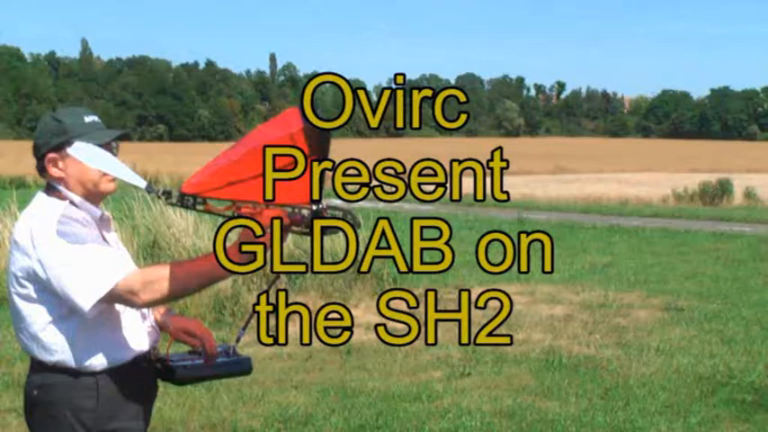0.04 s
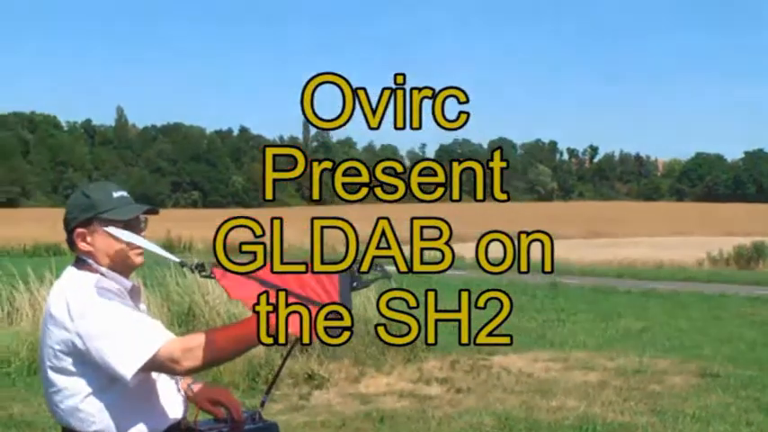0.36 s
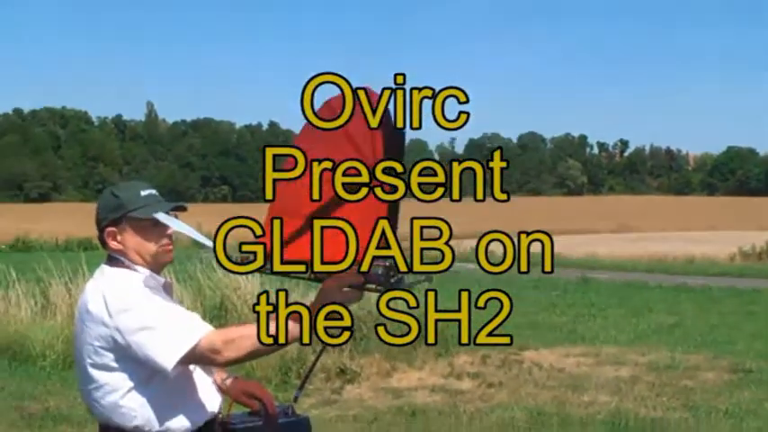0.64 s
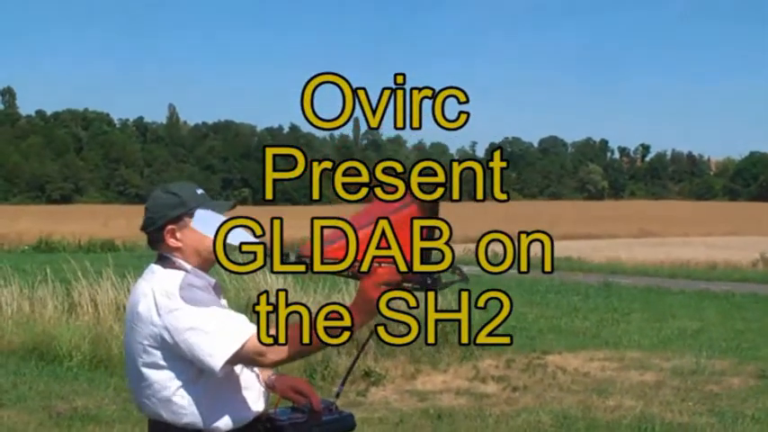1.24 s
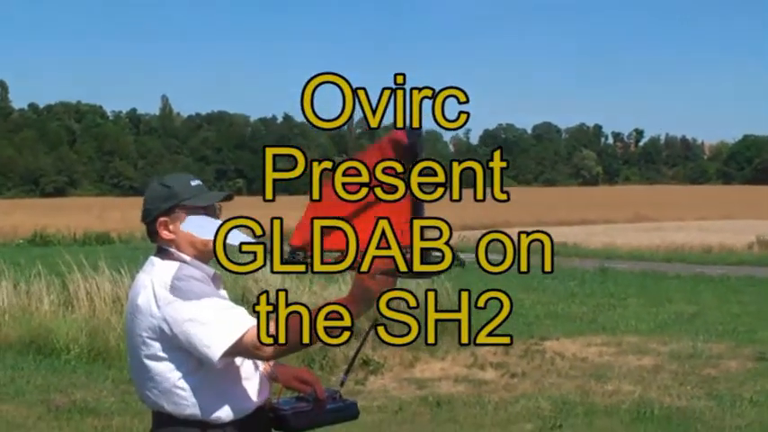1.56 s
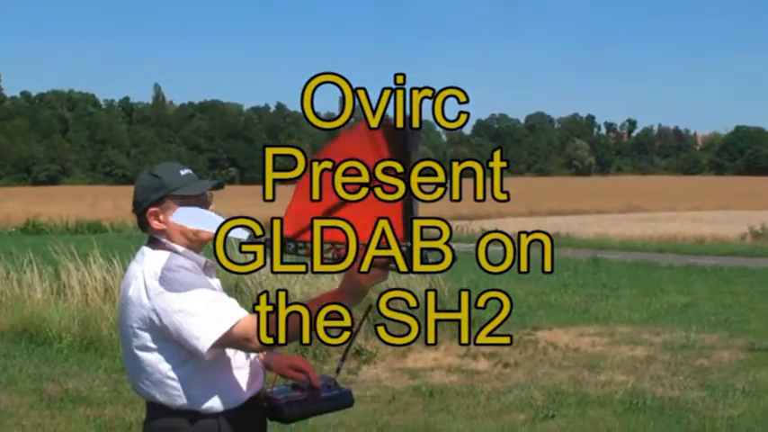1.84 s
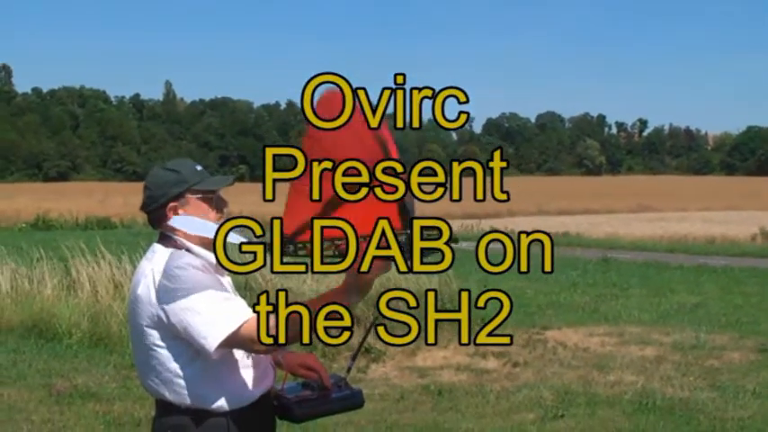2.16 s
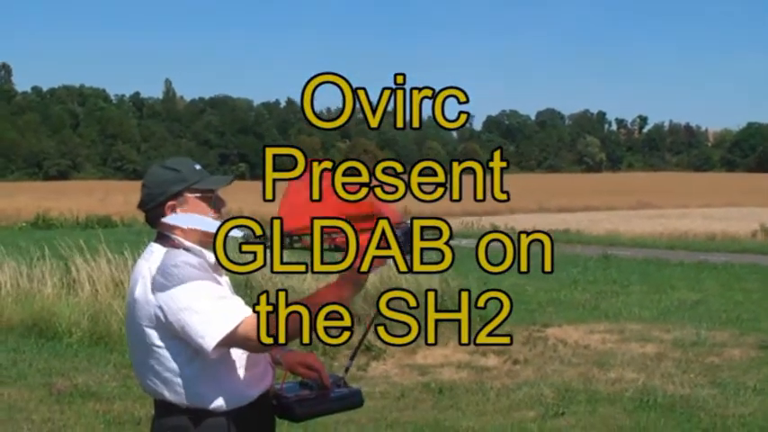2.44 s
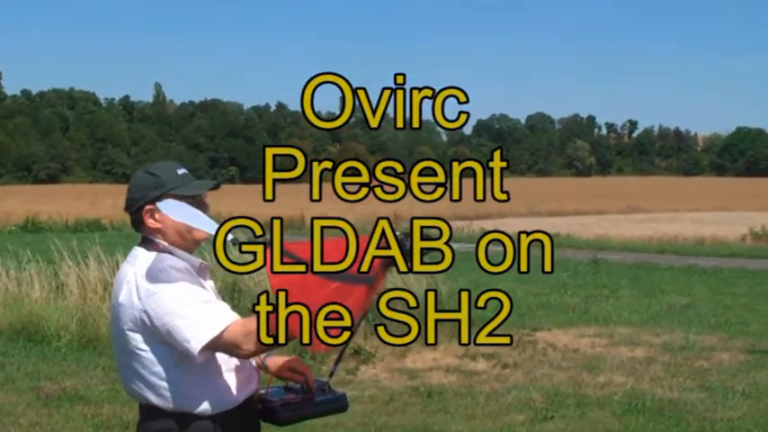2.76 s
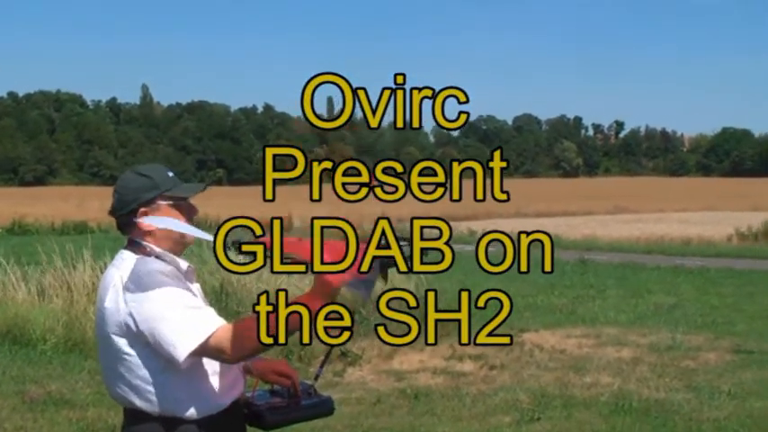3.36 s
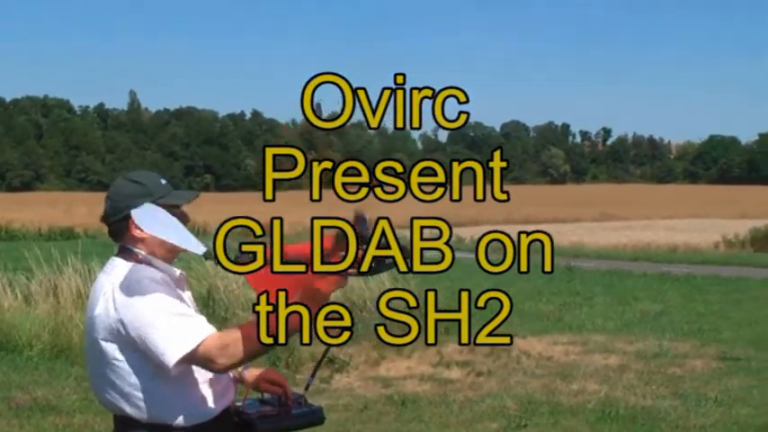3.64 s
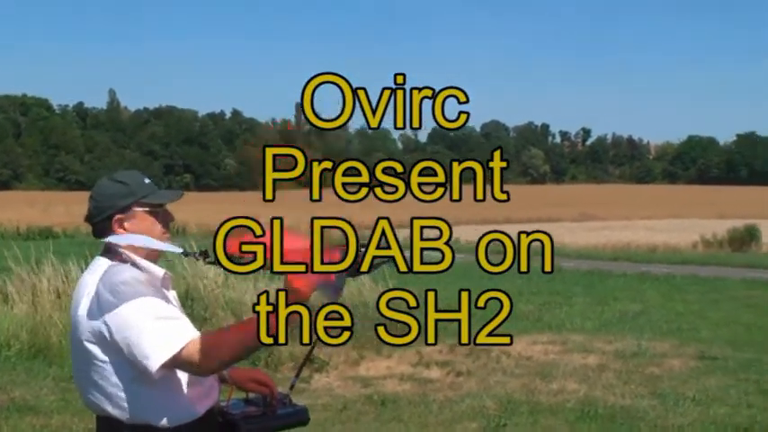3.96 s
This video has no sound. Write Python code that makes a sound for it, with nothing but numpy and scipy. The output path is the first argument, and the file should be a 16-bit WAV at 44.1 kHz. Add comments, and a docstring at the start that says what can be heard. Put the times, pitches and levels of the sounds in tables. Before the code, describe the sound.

Whirring gears and quickening wing flaps of a motorized toy bird, over low wind rumble.

```python
"""Flapping model bird in the wind

A hand-held model bird runs up its electric drive in an open field, to the listener's right.
The pinion whirs at its tooth rate, amplitude-modulated by a once-a-turn throb. Each wing
stroke loads the motor, so that the pitch sags while linkage and wing film rattle.
Moving air rumbles on the microphone."""
import sys
import numpy as np
from scipy.fft import rfft, irfft, next_fast_len
from scipy.io import wavfile
from scipy.ndimage import map_coordinates

SR = 44100
rng = np.random.default_rng(int(sys.argv[2]) if len(sys.argv) > 2 else 0)


def pcm_store(signal):
    """Save signal as 16-bit PCM."""
    levels = np.round(np.clip(np.atleast_2d(signal), -1, 1) * 32767)
    wavfile.write(sys.argv[1], SR, levels.astype(np.int16).T)


N = 176400
T = np.arange(N) / SR
START_S = .163

# motor speed without load (time [s], speed [turns/s])
FREE_SPEED = [(.17, 90), (.32, 133), (.42, 130), (.56, 148), (.7, 137), (.8, 139), (.9, 130), (1.02, 204),
              (1.16, 223), (1.5, 227), (1.77, 238), (1.9, 263), (2.05, 261), (2.7, 293), (2.95, 296),
              (3.13, 314), (3.45, 317), (3.78, 337), (4, 342)]
# wing strokes (time [s], relative rattle level [dB], speed lost [fraction])
STROKES = [(.65, -40, 0.077), (0.846, -30.5, 0.041), (1.06, -30.5, 0.1), (1.193, -23.5, 0.09),
           (1.382, -35, 0.098), (1.519, -30.5, .14), (1.681, -41, 0.13), (1.807, -27.5, .12),
           (1.966, -31, .11), (2.079, -25, 0.15), (2.22, -28, 0.075), (2.338, -22.5, 0.19),
           (2.485, -25.5, 0.082), (2.589, -25, 0.15), (2.728, -28.5, 0.069), (2.828, -22, 0.18),
           (2.955, -26.5, .08), (3.061, -19, 0.12), (3.179, -22, .08), (3.276, -15.5, 0.11),
           (3.396, -21, .08), (3.491, -20.5, 0.14), (3.615, -19, 0.082), (3.704, -20.5, 0.097),
           (3.82, -23, .09), (3.905, -17.5, 0.12), (3.99, -24, 0.075)]


def motor():
    """Load torque slows a motor at each stroke. Returns wing load, shaft angle and throb gain."""
    # once-a-turn modulation (speed [turns/s], depth [nepers])
    throb_depth = [(130, 1.05), (220, .72), (330, .55)]
    loads = np.array([swell(s, rise_s=.032, fall_s=.03) for s, _, _ in STROKES])
    sag = np.array(STROKES)[:, 2] @ loads
    speed = curve(FREE_SPEED) * (1 - sag) * (1 + .00305 * wobble(60))
    angle = 2 * np.pi * np.cumsum(speed) / SR
    depth = along(throb_depth, speed)
    throb = np.exp(depth * np.cos(angle)) / np.sqrt(np.i0(2 * depth))  # rms 1 over a turn
    return loads.sum(0), angle, throb


def gear_whine(load, angle, throb):
    """Tooth-rate harmonics, phase-modulated by an off-centre pinion, uneven teeth and backlash."""
    # mesh tones (harmonic number, slow level [dB], fast level [dB], load gain when fast [dB])
    harmonics = [(1, -3, -1, 13), (2, 2, 1.5, 6), (3, -11, -1.5, 8), (4, -14, -14, 4)]
    # radiation from the frame (frequency [Hz], gain [dB])
    frame_response = [(1200, -22), (2000, -14), (2900, 0), (3400, -7), (3850, 1), (4700, -1), (6400, -2),
                      (8200, -7), (8900, -14), (9600, -2), (10400, -9), (11300, -5)]
    # whine envelope (time [s], relative level [dB])
    levels = [(.17, -34.5), (.3, -34.5), (.37, -29.5), (.55, -29.5), (.63, -21.5), (.72, -29.5), (.82, -24),
              (.91, -29.5), (.98, -27.5), (1.06, -25), (1.3, -32), (1.8, -31.5), (2.3, -29), (2.8, -29),
              (3.3, -24.5), (3.6, -29), (4, -26.5)]
    teeth, eccentric_rad, tooth_error_rad, backlash_rad = 14, .7, .32, .2
    pace = np.interp(curve(FREE_SPEED), [175, 225], [0, 1])  # 0 slow, 1 fast
    errors = unit(sum(np.cos(k * angle + rng.uniform(0, 2 * np.pi)) / k for k in range(2, 7)))
    mesh_phase = teeth * angle + eccentric_rad * np.sin(angle) + tooth_error_rad * errors
    strain = np.interp(T + .022, T, load) - .5  # leads the load by 22 ms
    tones = 0
    for k, slow_db, fast_db, load_db in harmonics:
        db = slow_db + pace * (fast_db - slow_db + load_db * strain) + 4.3 * wobble(500)
        tones += amp(db) * np.cos(k * (mesh_phase + backlash_rad * wobble(900)))
    return coloured(unit(tones) * throb, frame_response) * amp(curve(levels))


def wing_rattle():
    """Impact noise: film and spars rattle as a stroke builds; the film snaps taut as it turns over."""
    # wing spectrum (frequency [Hz], spectral level [dB])
    spectrum = [(150, -6.5), (500, 3.5), (1200, 2), (1800, 3), (2600, 5), (3200, 2.5), (3900, 4.5),
                (5200, 1.5), (7000, -8.5), (8700, -16.5), (11500, -12)]
    strokes = sum(amp(db - 2) * swell(s, rise_s=.051, fall_s=.019) for s, db, _ in STROKES)
    reversals = sum(amp(db - 7) * swell(s, rise_s=.012, fall_s=.012) for s, db, _ in STROKES)
    snaps = reversals * crackle(spectrum, hits_per_s=500, hit_share=.79)
    flutter = amp(1.6 * wobble(150))
    return snaps + strokes * flutter * crackle(spectrum, hits_per_s=2500, hit_share=.6)


def drive_clatter(throb):
    """Loose gears and links collide, giving impact noise modulated at the shaft rate."""
    # clatter envelope (time [s], relative level [dB])
    levels = [(.17, -35.5), (.35, -35.5), (.8, -32), (.93, -35.5), (1.2, -32), (1.7, -33.5), (2.3, -32.5),
              (2.8, -32), (3.29, -27), (3.6, -33), (4, -30)]
    # clatter spectrum (frequency [Hz], spectral level [dB])
    spectrum = [(150, -60), (600, -3.5), (1200, 2), (1800, -2), (2600, 2), (3200, 1), (3900, 6.5),
                (5200, 0.5), (7000, -9), (8200, -9.5), (8900, -16.5), (9600, -4), (10500, -9),
                (11400, -11.5)]
    envelope = amp(curve(levels) + 2.5 + .75 * wobble(35)) * unit(throb ** .23)
    return envelope * crackle(spectrum, hits_per_s=3200, hit_share=.59)


def linkage_ticks():
    """The linkage takes up its slack in impacts, each an exponentially damped noise burst."""
    # impacts (time [s], relative level [dB])
    ticks = [(0.1655, -38), (0.27, -20.5), (0.4204, -12), (0.886, -10.5)]
    # tick spectrum (frequency [Hz], spectral level [dB])
    spectrum = [(1000, 2), (4000, -19), (5500, 18), (7500, 5), (11500, 3.5)]
    decay_s = .002
    envelope = sum(amp(db - 7) * (T >= s) * np.exp(-abs(T - s) / decay_s) for s, db in ticks)
    return envelope * unit(coloured(rng.standard_normal(N), spectrum))


def far_side(scattered):
    """Acoustic shadow: the bird reaches the left port by scattered paths, losing most treble."""
    # left port against right (frequency [Hz], gain [dB])
    shadow = [(300, 3.5), (1100, -2), (2000, -13.5), (3700, -18.5), (5500, -15.5), (7000, -13.5),
              (8200, -3.5), (8900, 7.5), (9400, -5.5), (11500, -57)]
    return coloured(scattered, shadow)


def wind():
    """Pressure fluctuations of moving air on the microphone: low buffeting and a higher rumble."""
    # envelopes (time [s], relative level [dB])
    buffet_levels = [(0.2, -21.5), (0.54, -23.5), (1.02, -18.5), (2.34, -46), (2.36, -25.5), (2.82, -25.5),
                     (2.89, -46), (3.18, -24.5), (3.25, -27.5), (3.45, -18.5), (3.5, -44), (3.52, -26.5),
                     (3.83, -21), (3.86, -38), (3.97, -17), (4.0, -24)]
    rumble_levels = [(0.2, -19.5), (0.38, -19), (0.43, -29), (0.45, -15.5), (0.59, -31), (0.61, -21.5),
                     (1.12, -22), (1.15, -31.5), (1.24, -18), (1.28, -21), (2.62, -21.5), (2.69, -27.5),
                     (2.77, -20), (3.13, -26.5), (3.15, -20), (3.27, -26), (3.29, -20.5), (4.0, -22.5)]
    # spectra (frequency [Hz], spectral level [dB])
    buffet_spectrum = [(12, -60), (25, -25), (40, -12), (70, -1), (110, 0), (160, -6), (260, -22),
                       (600, -50), (3000, -90)]
    rumble_spectrum = [(30, -17), (90, -4), (150, -1.5), (290, -1), (400, -7), (520, -12.5), (800, -21),
                       (1200, -34.5), (2500, -35), (8000, -72)]
    buffet = amp(curve(buffet_levels) - 3.5) * gusts(buffet_spectrum)
    rumble = amp(curve(rumble_levels)) * gusts(rumble_spectrum)
    fade_in = np.clip((T - START_S) / .036, 0, 1)
    return (buffet + rumble) * fade_in


def gusts(spectrum, lumps_db=1.5, left_lag_s=.0001):
    """Lumpy stereo noise of rms 1, whose coherence between the ports falls with frequency."""
    # likeness of the two ports (frequency [Hz], correlation [0-1])
    coherence = [(60, 0.99), (130, 0.83), (270, 0.75), (600, 0), (2000, 0)]
    # wind at the left port against right (frequency [Hz], gain [dB])
    left_gain = [(60, -2.5), (180, 0.5), (350, -6), (700, -2)]

    def mid_side(hz):
        turn = np.arccos(along(coherence, hz)) / 2
        return amp(along(spectrum, hz)) * [np.cos(turn), np.sin(turn)]

    mid, side = filtered(rng.standard_normal((2, N)), mid_side)
    left = coloured(mid + side, left_gain)
    left = filtered(left, lambda hz: np.exp(-2j * np.pi * hz * left_lag_s))
    return unit(np.array([left, mid - side]) * amp(lumps_db * wobble(45)))


def crackle(spectrum, hits_per_s, hit_share):
    """Shot noise over a rustle, rms 1; the impacts carry hit_share of the power."""
    hits = (rng.random(N) < hits_per_s / SR) * rng.standard_normal(N)
    rustle = np.sqrt(1 - hit_share) * rng.standard_normal(N)
    return unit(coloured(np.sqrt(hit_share) * unit(hits) + rustle, spectrum))


def amp(db):
    """Decibels to amplitude ratio."""
    return 10 ** (np.asarray(db) / 20)


def unit(x):
    """Scale to rms 1."""
    return x / np.sqrt(np.mean(x ** 2) + 1e-20)


def along(points, hz):
    """Interpolate (frequency [Hz], value) points on a log axis."""
    freqs, values = np.transpose(points)
    return np.interp(np.log(hz + 1), np.log(freqs + 1), values)


def curve(points):
    """Interpolate (time [s], value) points at every sample."""
    return np.interp(T, *np.transpose(points))


def wobble(rate):
    """A smooth random curve with rate knots a second."""
    return map_coordinates(rng.standard_normal(N // 4), [T * rate], mode="wrap")


def swell(peak_s, rise_s, fall_s):
    """A Gaussian pulse with separate rise and fall widths."""
    return np.exp(-((T - peak_s) / np.where(T < peak_s, rise_s, fall_s)) ** 2)


def filtered(x, response):
    """Multiply the spectrum of x by a frequency response."""
    size = next_fast_len(N + SR // 2)
    return irfft(rfft(x, size) * response(np.fft.rfftfreq(size, 1 / SR)), size)[..., :N]


def coloured(x, gains):
    """Filter x by (frequency [Hz], gain [dB]) points."""
    return filtered(x, lambda hz: amp(along(gains, hz)))


def scene():
    """Superposition of bird and wind; direct and scattered sound share the motion, not the noise."""
    load, angle, throb = motor()

    def bird():
        return gear_whine(load, angle, throb) + drive_clatter(throb) + wing_rattle() + linkage_ticks()

    direct, scattered = bird(), bird()
    return np.array([far_side(scattered), direct]) + wind()


def record(dry):
    """Gating and band limiting: the sound starts a moment in and lacks the highest treble."""
    top_hz = 11620
    return filtered(dry * (T > START_S), lambda hz: hz < top_hz)


dry = scene()
out = record(dry)
pcm_store(out)
```